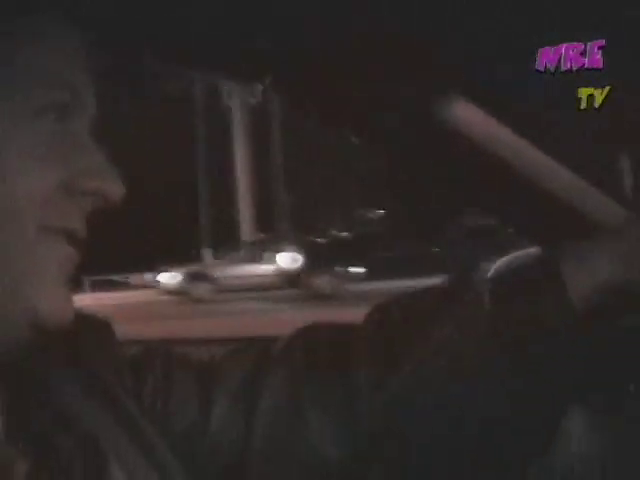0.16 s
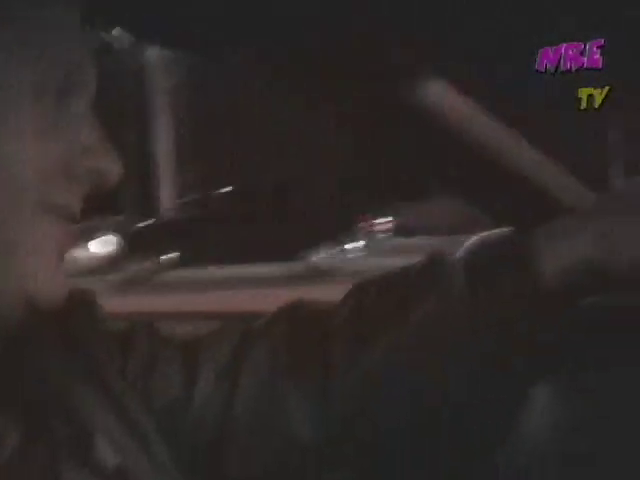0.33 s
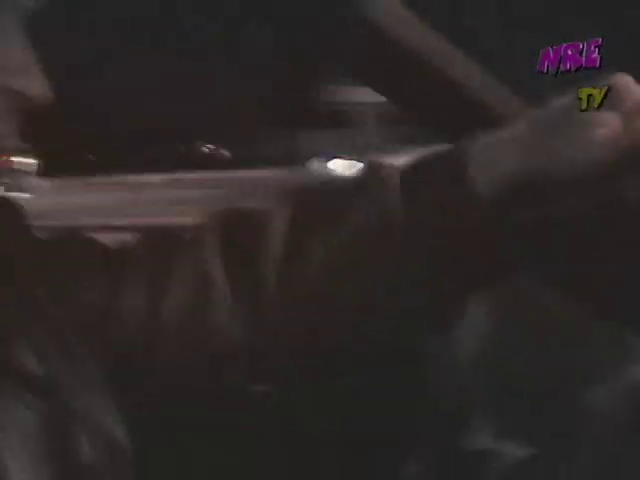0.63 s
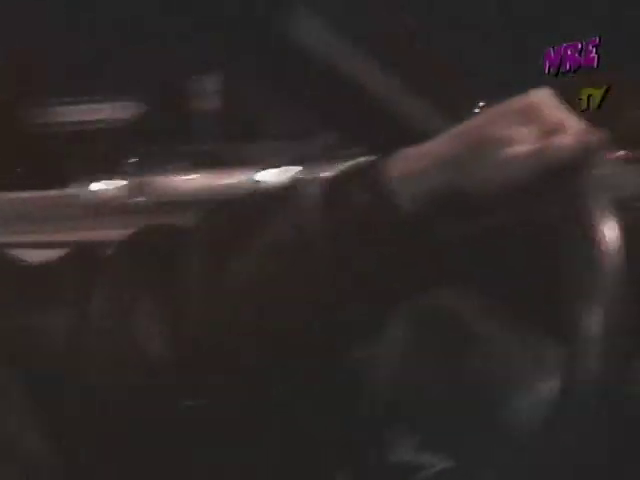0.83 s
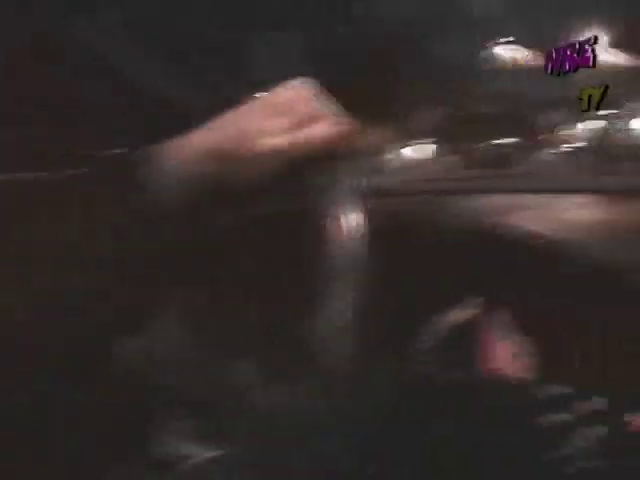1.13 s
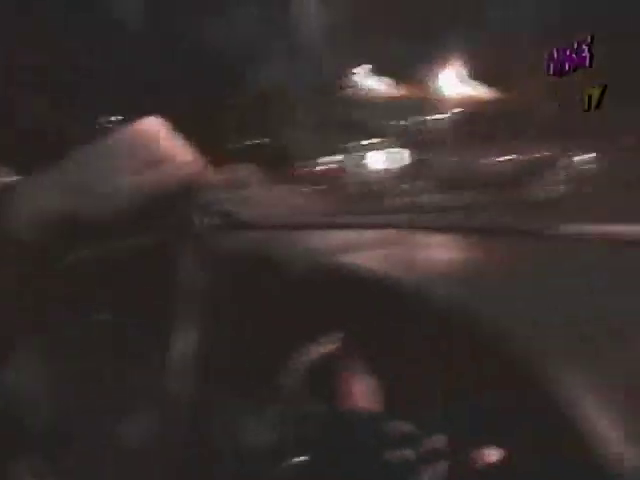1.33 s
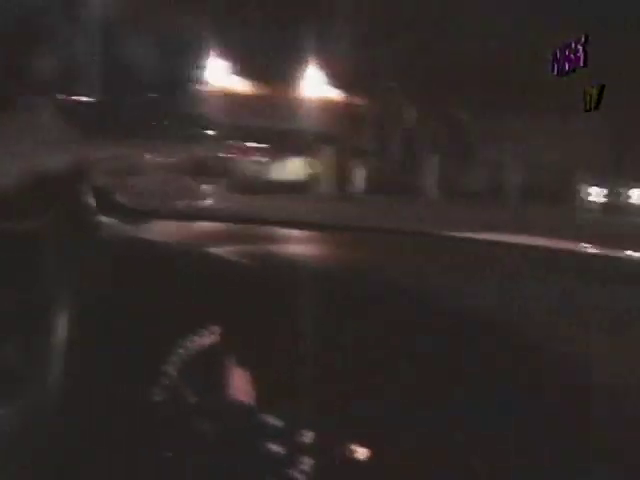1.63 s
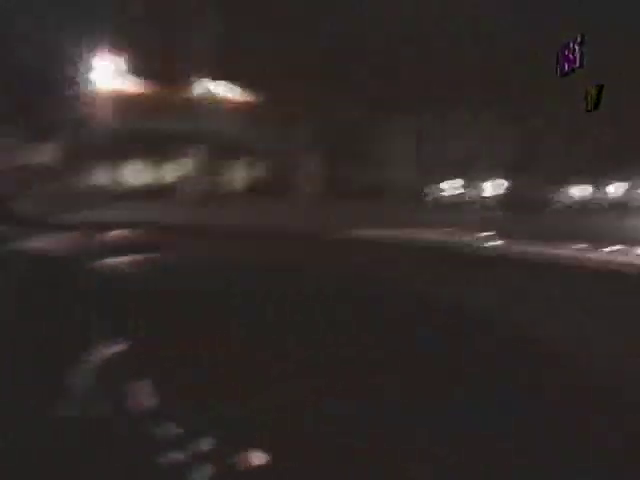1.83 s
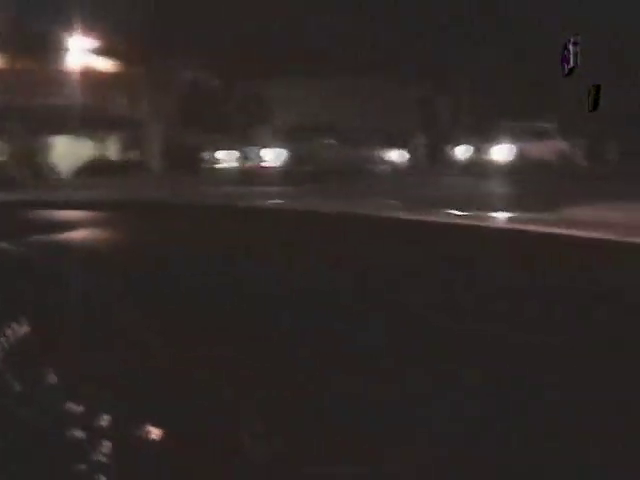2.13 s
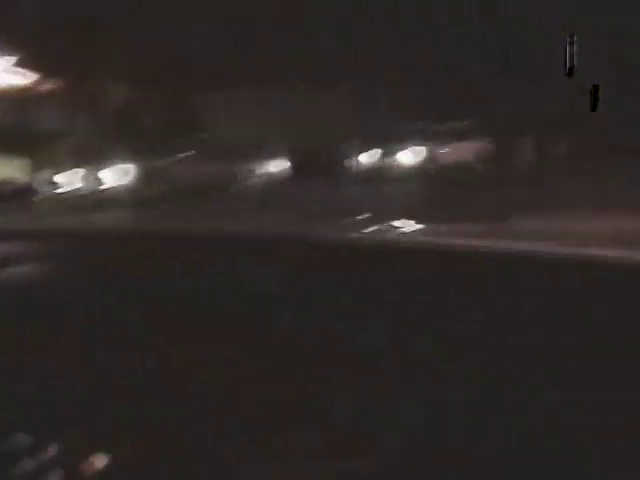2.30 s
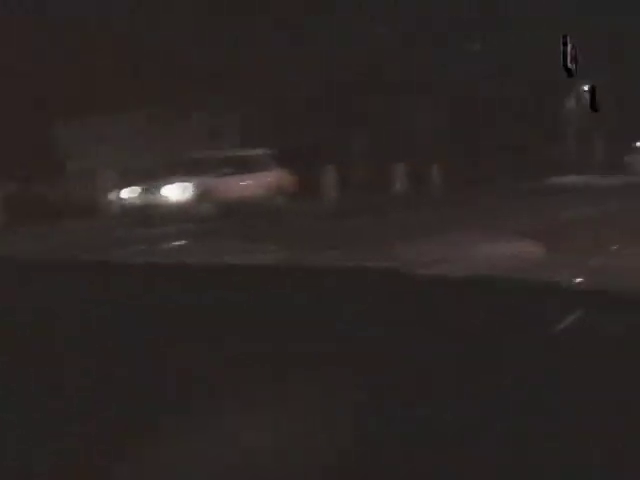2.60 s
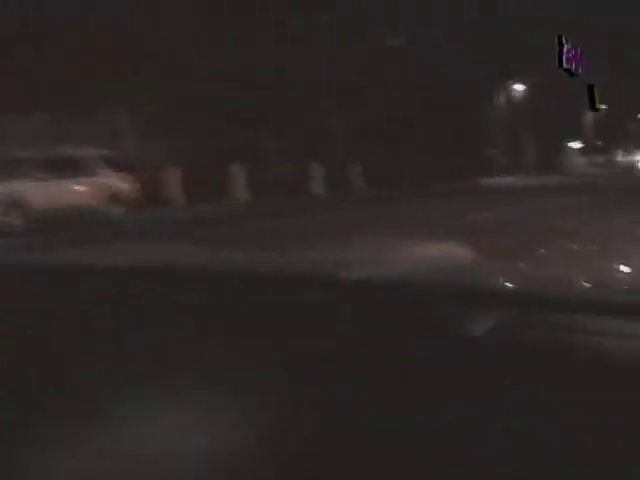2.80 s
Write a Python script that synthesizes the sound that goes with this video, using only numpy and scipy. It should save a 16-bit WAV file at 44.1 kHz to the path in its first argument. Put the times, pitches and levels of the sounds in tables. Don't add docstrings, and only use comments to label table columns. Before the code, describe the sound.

Inside a moving car, a throaty turbocharged engine changes gear and accelerates with growing roar and thin whine

```python
import sys
import numpy as np
from scipy import signal
from scipy.io import wavfile

SR = 44100
rng = np.random.default_rng(int(sys.argv[2]) if len(sys.argv) > 2 else 0)


def inscribe(sig):
    pcm = np.round(np.clip(np.atleast_2d(sig).T, -1, 1) * 32767)
    wavfile.write(sys.argv[1], SR, pcm.astype(np.int16))


def amplitude_ratio(level_db):
    exponent = np.asarray(level_db, float) / 20
    return 10 ** exponent


N = 130095

# time_s, speed_rps (turns per second)
CRANK_SPEED = [(0, 39.8), (.1, 37.4), (.17, 36), (.23, 33.3), (.27, 31.39), (.4, 33.54), (.5, 33.24),
               (.7, 34.69), (1, 36.72), (1.3, 39.1), (1.6, 41.57), (1.9, 43.77), (2.2, 45.95), (2.5, 48.24),
               (2.75, 49.9), (2.95, 51.09)]
# time_s, throttle_0_to_1, intake_level_db
DRIVE = [
    (0.03, 0.65, -38.5),
    (0.19, 1, -37),
    (0.21, 1, -32),
    (0.27, 0.92, -39),
    (0.39, 0.86, -35.5),
    (0.94, 0.83, -36.5),
    (1.49, 0.9, -29.5),
    (2.73, 0.78, -32.5),
    (2.92, 0.78, -29.5),
]
# beats, coasting_db, low_speed_db, middle_speed_db, high_speed_db
BOOM_ORDERS = [(2, -28.5, -47, -35, -18.5), (3, -20, -32.5, -31, -24), (4, -10, -21.5, -20, -18.5),
               (5, -24.5, -22, -18, -13), (6, -13.5, -17.5, -20.5, -15.5), (7, -47.5, -46, -39, -36),
               (8, -14, -7.5, -10.5, -16), (9, -25.5, -22, -37.5, -41.5), (10, -33, -27, -52, -29),
               (11, -42.5, -34, -59.5, -57), (12, -43, -34.5, -44, -42.5), (13, -42, -48.5, -31.5, -36),
               (14, -45.5, -39.5, -45.5, -47.5), (16, -45, -44.5, -37, -38), (17, -38, -37.5, -58.5, -51.5),
               (21, -45.5, -40.5, -47, -40.5)]
LOW_MID_HIGH_RPS = [35.37, 41.35, 49.9]
BOOM_LEADS = {2: (0, .2, 1), 4: (0, .35, 3), 5: (0, .15, .5), 6: (.08, .45, 1)}
CYLINDER_DB = [0, -1, -.5, -1.5, -.5, 0, -1.5, -1]
# pitch_hz, level_db (per Hz)
INTAKE_SPECTRUM = [(850, -14), (1250, -0.5), (1900, -2.5), (2550, -4.5), (2900, -9.5), (4800, -11.5),
                   (6000, -41.5), (7000, -55)]
# pitch_hz, width_hz, level_db
PANELS = [(1030, 40, -3), (1160, 35, -1), (1270, 50, 0), (1500, 40, -2), (1760, 35, -1), (1950, 35, 1),
          (2220, 60, -3), (2420, 110, 0), (2800, 60, -5), (3240, 60, -1), (3700, 90, -5), (4250, 90, -5),
          (4860, 110, 1)]
# pitch_hz, level_db (per Hz)
DRONE_SPECTRUM = [(330, 2), (450, -2), (640, 0), (820, 0.5), (1000, -23), (1250, -16)]
# pitch_hz, level_db
CAM_WHINE = [(1070, -44), (1115, -54), (1145, -33), (1200, -38), (1255, -29), (1330, -47), (1430, -38),
             (1640, -43)]
# pitch_hz, level_db
PUMP_WHINE = [(3250, -68), (3350, -53), (3720, -56), (4080, -64), (4200, -39), (4400, -48), (4680, -40),
              (4950, -53)]
# pitch_hz, level_db (per Hz)
RUMBLE_SPECTRUM = [(25, 4.5), (50, -6.5), (90, -5), (170, -3.5), (260, -11), (350, -11), (500, -14.5),
                   (900, -24.5)]
# pitch_hz, level_db (per Hz)
HISS_SPECTRUM = [(5500, -0.5), (7400, -7.5), (8500, 1), (10000, -5), (12000, -3.5), (14000, -24.5),
                 (15200, -20)]
# pitch_hz, likeness (1 = the same)
LIKENESS = [(30, 1), (150, 0.76), (500, 0.94), (2000, 0.92), (4000, 0.97), (6000, 1), (8000, .2),
            (13000, .8)]
# pitch_hz, left_minus_right_db
LEAN = [(60, -2), (190, -1.0), (580, 1.5), (1790, 0), (5540, -0.5)]


def rms_one(x):
    return x / np.sqrt(np.mean(x ** 2) + 1e-20)


def at_hz(points, hz):
    curve = np.array(points)
    return np.interp(np.log(hz), np.log(curve[:, 0]), curve[:, 1])


def lean(hz):
    return amplitude_ratio(np.multiply.outer(np.array([.5, -.5]), at_hz(LEAN, hz)))


def drift(rate):
    r = np.exp(-80 * np.pi * rate / SR)
    slow = signal.lfilter([1], [1, -2 * r, r * r], rng.standard_normal(N // 40 + 2002))[2000:]
    return np.interp(np.arange(N) / 40, np.arange(len(slow)), rms_one(slow - slow.mean()))


def resonate(x, hz, width_hz):
    r = np.exp(-np.pi * width_hz / SR)
    top = np.array([1, 0, -1]) * (1 - r * r) / 2
    return signal.lfilter(top, [1, -2 * r * np.cos(2 * np.pi * hz / SR), r * r], x)


def band_filter(x, low_hz, high_hz):
    return signal.sosfilt(signal.butter(2, [low_hz, high_hz], "band", fs=SR, output="sos"), x)


def banded(white, spectrum, patchy_db, tilt_db=0):
    lowest, highest = spectrum[0][0], spectrum[-1][0]
    edges = np.geomspace(lowest, highest, int(2.5 * np.log2(highest / lowest)) + 2)
    out, together = 0, drift(1.3)
    for k, (low, high) in enumerate(zip(edges, edges[1:])):
        mid, side = band_filter(white[k % 2], low, high)
        hz = np.sqrt(low * high)
        alike = np.clip(at_hz(LIKENESS, hz), -1, 1)
        flicker_db = patchy_db * (.6 * together + drift(12))
        gain = amplitude_ratio(at_hz(spectrum, hz) + flicker_db + tilt_db * np.log2(hz / 2000))
        stereo = np.sqrt(1 + alike) * mid + np.sqrt(1 - alike) * side * [[1], [-1]]
        out = out + gain * lean(hz)[:, None] * stereo
    return rms_one(out)


def boom(cycle, rps, load):
    low_rps, _, high_rps = LOW_MID_HIGH_RPS
    slowness = np.clip((high_rps - rps) / (high_rps - low_rps), 0, 1)
    judder_hz, judder_peak_s, judder_db = 8.9, 0.13, 4
    judder = judder_db * (np.cos(2 * np.pi * judder_hz * (np.arange(N) / SR - judder_peak_s)) - .5)
    wobble_db, coast_wobble_db, wobble_rad = .9, 1.5, .15
    pipe_hz, pipe_width_hz, pipe_db = 317.5, 22, 8
    out = 0
    for k, coast_db, *pull_db in BOOM_ORDERS:
        k = round(k)
        hz = k * rps / 2
        db = load * np.interp(rps, LOW_MID_HIGH_RPS, pull_db) + (1 - load) * (coast_db + judder)
        steadiness = 1 - .5 * (k == 8)
        db = db + (wobble_db + (1 - load) * coast_wobble_db) * drift(10) * steadiness
        db = db + pipe_db * np.exp(-((hz - pipe_hz) / pipe_width_hz) ** 2)
        always, slow, fade = BOOM_LEADS.get(k, (0, 0, 1))
        flipped = .5 * (k not in (3, 10, 13))
        turns = k * cycle + always + slow * slowness ** fade + flipped
        out = out + np.sqrt(2) * amplitude_ratio(db) * np.cos(2 * np.pi * turns + wobble_rad * drift(2)) * lean(hz)
    return out


def firing_noise(white, cycle):
    firing = 8 * cycle
    strength = amplitude_ratio(np.array(CYLINDER_DB)[np.floor(firing).astype(int) % 8])
    rasp_depth = 0.13
    return white * strength * (1 - rasp_depth + rasp_depth * 3 * np.exp(-3 * (firing % 1)))


def intake(puffs, rps, boost_db):
    bright_full_rps, brighten_db_per_rps = 42, 0.49
    tilt_db = brighten_db_per_rps * np.minimum(rps - bright_full_rps, 0)
    broad = banded(puffs, INTAKE_SPECTRUM, patchy_db=1.06, tilt_db=tilt_db)
    panels = 0
    for k, (hz, width, db) in enumerate(PANELS):
        ring = resonate(resonate(broad, hz, 1.5 * width), hz, 1.5 * width)
        gain = amplitude_ratio(db + drift(3.2)) * amplitude_ratio(at_hz(INTAKE_SPECTRUM, hz))
        panels = panels + (-1) ** k * gain * rms_one(ring)
    roar_db, panel_db = 2.5, 1.0
    return amplitude_ratio(roar_db + boost_db) * rms_one(broad + amplitude_ratio(panel_db) * rms_one(panels))


def exhaust(puffs, rps):
    drone_db, drone_db_per_rps = -32.5, 0.59
    drone = banded(puffs, DRONE_SPECTRUM, patchy_db=1.53)
    pipe_ring = amplitude_ratio(-9.5) * rms_one(resonate(drone, 648, 12.3))
    sill_ring = amplitude_ratio(-8.5) * rms_one(resonate(drone, 1153, 50))
    return amplitude_ratio(drone_db + drone_db_per_rps * (rps - 45)) * (drone + pipe_ring + sill_ring)


def whine(cycle, rps, load, teeth, passes):
    flutter_db, wander_rad, coast_drop_db = 2.5, .5, 12
    db = at_hz(passes, teeth * rps) + flutter_db * drift(18) - coast_drop_db * (1 - load)
    wander = wander_rad * teeth / 96 * drift(30)
    return np.sqrt(2) * amplitude_ratio(db) * np.cos(4 * np.pi * teeth * cycle + wander)


def clunk():
    start_s, level_db, fall_60_db_s = .212, -28.5, 0.031
    t = np.arange(N) / SR - start_s
    burst = rng.standard_normal(N) * (t > 0) * amplitude_ratio(-60 * np.maximum(t, 0) / fall_60_db_s)
    return amplitude_ratio(level_db) * band_filter(burst, 300, 3500)


def road(settled):
    rumble_db, coast_rumble_db = -32, 4
    cabin_hz, cabin_width_hz, cabin_db, cabin_fades_db = 253.7, 28, -31, 7.5
    rumble = banded(rng.standard_normal((2, 2, N)), RUMBLE_SPECTRUM, patchy_db=0.0)
    ring = rms_one(resonate(rumble, cabin_hz, cabin_width_hz))
    cabin = amplitude_ratio(cabin_db - cabin_fades_db * settled) * ring
    return amplitude_ratio(rumble_db + coast_rumble_db * (1 - settled)) * rumble + cabin


def hiss(rps):
    air_db, air_db_per_rps, full_rps, steady_db = -47.5, 1.68, 45.7, -55
    air = amplitude_ratio(air_db + air_db_per_rps * np.minimum(rps - full_rps, 0))
    noise = banded(rng.standard_normal((2, 2, N)), HISS_SPECTRUM, patchy_db=1.2)
    return (air + amplitude_ratio(steady_db)) * noise


def smooth_step(t, middle_s, takes_s):
    return 1 / (1 + np.exp(-(t - middle_s) / takes_s))


def scene():
    t = np.arange(N) / SR
    rps = np.interp(t, *np.transpose(CRANK_SPEED))
    time_s, throttle, boost_db = np.transpose(DRIVE)
    throttle, boost_db = np.interp(t, time_s, throttle), np.interp(t, time_s, boost_db)
    load = smooth_step(t, .25, .04)
    settled = smooth_step(t, 0.68, 0.078)
    cycle = np.cumsum(rps) / 2 / SR
    odd_firing_s = 2.8768
    cycle = cycle - cycle[int(odd_firing_s * SR)]
    white = rng.standard_normal((2, 2, 2, N))
    puffs = firing_noise(white, cycle)
    engine = np.clip(throttle, .3, 2) * boom(cycle, rps, load)
    engine = engine + intake(puffs[0], rps, boost_db) + exhaust(puffs[1], rps)
    whines = whine(cycle, rps, load, 32, CAM_WHINE) + whine(cycle, rps, load, 96, PUMP_WHINE)
    return engine + whines + clunk() + road(settled) + hiss(rps)


def band_limit(x):
    return signal.sosfilt(signal.butter(12, 15200, fs=SR, output="sos"), x)


def record(dry):
    notch_hz, notch_width_hz, notch_depth = 7400, 1600, .75
    dry = dry - notch_depth * resonate(dry.mean(axis=0), notch_hz, notch_width_hz)
    top = 1.8
    mix = top * np.tanh(dry / top)
    return band_limit(mix)


dry = scene()
out = record(dry)
inscribe(out)
```